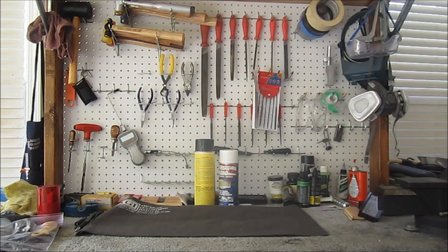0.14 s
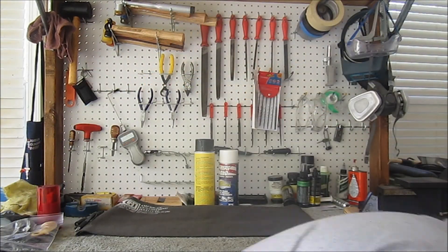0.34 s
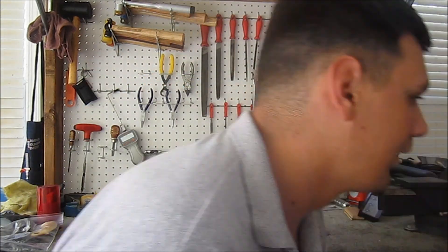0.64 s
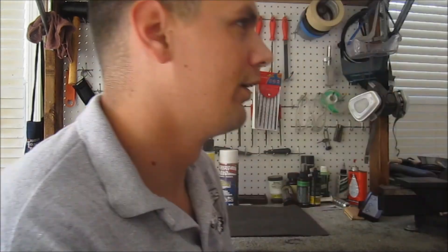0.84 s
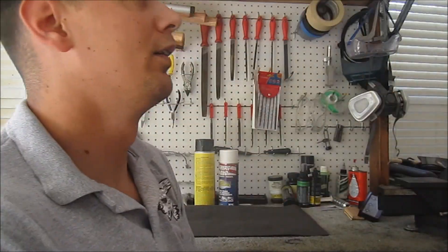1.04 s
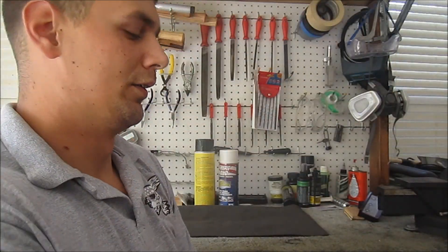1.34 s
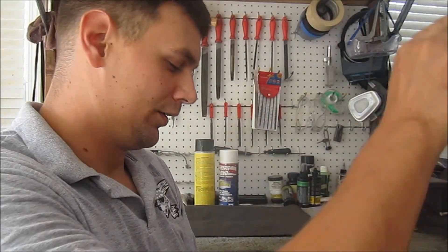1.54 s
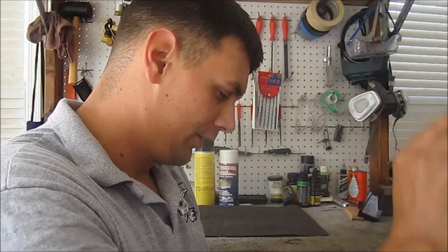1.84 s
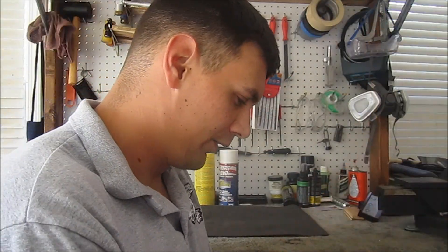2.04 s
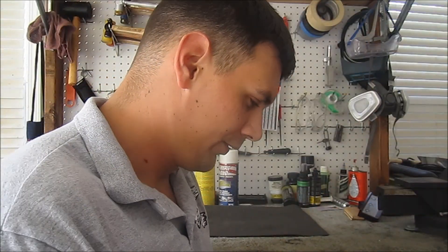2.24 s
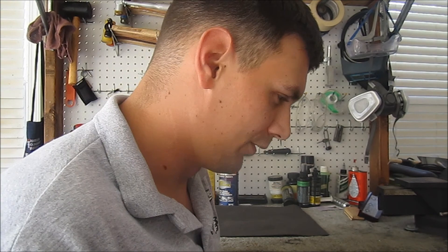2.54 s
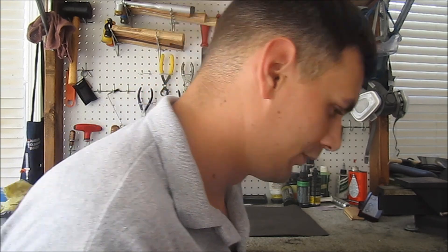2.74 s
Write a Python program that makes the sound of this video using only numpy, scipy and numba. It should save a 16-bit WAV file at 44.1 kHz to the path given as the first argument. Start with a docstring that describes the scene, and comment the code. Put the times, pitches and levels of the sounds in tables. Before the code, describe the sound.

A short steel bar cracks onto a concrete workshop floor and bounces, ringing with wavering high tones

```python
"""A short steel bar, handled and then dropped on the concrete floor of a small workshop, cracks and bounces up ringing.
Flying, it sends each ring along four paths to the microphone: Doppler shift gives falling and rising tones.
Before the drop, grainy noise rubs the held bar, and short pushes make taps and dull knocks; shoes and cloth shuffle.
Filtered noise makes the air, insects and low hum outside; delay lines and dying noise bands make the room.
The recorder's gain creeps up in the quiet and ducks at the blow, before a soft overload."""
import sys
import numpy as np
from scipy import signal
from scipy.fft import rfft, irfft
from scipy.io import wavfile
from scipy.ndimage import uniform_filter1d
from numba import njit

SR = 44100
rng = np.random.default_rng(int(sys.argv[2]) if len(sys.argv) > 2 else 0)


def log_audio(samples):
    """Write samples as a 16-bit WAV file to the path given in sys.argv[1]."""
    # one column per channel
    frames = np.atleast_2d(samples).T
    # limit to full scale, then quantise
    limited = np.clip(frames, -1, 1)
    pcm = np.round(limited * 32767).astype(np.int16)
    wavfile.write(sys.argv[1], SR, pcm)


def elevation(decibels):
    """Turn decibel levels (scalar or array-like) into linear amplitude ratios."""
    levels = np.asarray(decibels, float)
    return 10 ** (levels / 20)


N = 127890  # length in samples; source levels below are ahead of the recorder's gain


def curve(rows, col):
    """One column of a table, interpolated along the time axis."""
    points = np.array(rows)
    return np.interp(np.arange(N) / SR, points[:, 0], points[:, col])


def ring(force, hz, t60):
    """One mode: a two-way resonance that a force excites and that decays 60 dB in t60 seconds."""
    pole = np.exp(2j * np.pi * hz / SR - np.log(1000) / (t60 * SR))
    return signal.lfilter([1], [1, -pole], force).imag


def band(x, hz, width):
    """Resonant band-pass, scaled to unit rms."""
    y = signal.lfilter(*signal.iirpeak(hz, hz / width, SR), x)
    return y / y.std()


def push(s, db, ms):
    """A bell-shaped contact force; ms is three standard deviations, db sets its area."""
    t = np.arange(N) / SR - s
    w = ms / 1000
    bell = np.exp(-.5 * np.minimum((t / w * 3) ** 2, 200))
    return elevation(db) * bell * 3 / (w * SR * np.sqrt(2 * np.pi))


def walk(rate):
    """Slow random wander, smoothed from `rate` fresh values a second."""
    k = int(SR / rate)
    steps = np.repeat(rng.standard_normal(N // k + 1), k)
    return 0.37 * uniform_filter1d(uniform_filter1d(steps, k), k)[:N]


# spectral shape of the outside air: (frequency [Hz], relative density [dB per Hz])
AIR_SHAPE = [(12, -41.5), (20, -6.5), (116, -2.5), (150, -6.5), (277, -5), (319, -8), (357, -9.5),
             (1120, -15.5), (2200, -28), (4810, -10.5), (6720, -34.5), (8650, -12.5), (10800, -29.5),
             (13200, -18), (16000, -49)]
AIR_DB = -74  # before its slow wander
# insect chorus: (centre [Hz], bandwidth [Hz], level before shimmer [dB])
INSECTS = [(4125, 180, -79.5), (4773, 120, -81), (4685, 550, -82), (9295, 330, -83.5), (12790, 1300, -100)]
# low hum: (frequency [Hz], level [dB])
HUM = [(58, -87.5), (115, -88.5), (176, -91.5), (231, -89.5)]


def outside():
    """Out of doors: noise coloured by a spectrum, shimmering insect bands, and hum as narrow wavering bands."""
    shape, f = np.array(AIR_SHAPE), np.arange(N // 2 + 1) * SR / N + 1
    colour = elevation(np.interp(np.log(f), np.log(shape[:, 0]), shape[:, 1]))
    air = irfft(rfft(rng.standard_normal(N)) * colour, N)
    out = elevation(AIR_DB + walk(5.3)) * air / air.std()
    for hz, width, db in INSECTS:
        out = out + elevation(db + 2.0 * walk(18)) * band(rng.standard_normal(N), hz, width)
    for hz, db in HUM:
        out = out + elevation(db) * band(rng.standard_normal(N), hz, 5.5)
    return out


@njit
def walls(x, lags, gain, damp):
    """The room's echoes: eight delay lines that feed each other, duller on every round."""
    line, soft, out = np.zeros((8, 4096)), np.zeros(8), np.zeros(len(x))
    for i in range(len(x)):
        total = 0.
        for k in range(8):
            soft[k] += (1 - damp) * (gain[k] * line[k, (i - lags[k]) & 4095] - soft[k])
            total += soft[k]
            out[i] += soft[k] * (1 - 2 * (k % 2))  # alternate signs
        for k in range(8):
            line[k, i & 4095] = x[i] + soft[k] - total / 4
    return out


ROOM_T60_S, ROOM_DAMP = 0.51, 0.29  # decay before damping; damping is 0 (bright) to 1
RING_SEND_DB, NEAR_SEND_DB = -23, -26.5  # the flying bar; the crack, handling and shuffle


def room(free, near):
    """Workshop reverberation: both indoor groups are sent into the network of wall echoes."""
    lags = np.array([331, 457, 613, 787, 953, 1171, 1409, 1663])  # samples
    send = elevation(RING_SEND_DB) * free + elevation(NEAR_SEND_DB) * near + 1e-18
    return walls(send, lags, elevation(-60 * lags / SR / ROOM_T60_S), ROOM_DAMP)


LANDS_S = 2.2187  # when the bar leaves the floor and the scattered tail begins
# diffuse tail of the crack: (centre [Hz], level before build-up and decay [dB], t60 [s])
WASH = [(170, -52.5, 0.5), (280, -54, 0.67), (500.4, -45.5, 0.52), (622, -45.5, 0.42), (1076.9, -35, 0.304),
        (1503, -50.5, 0.57), (2312.4, -40, 0.45), (3450, -30, 0.418), (4502, -31, 0.519), (5567, -31, 0.41),
        (7130, -49.5, 0.14), (9538, -42.5, 0.3), (12380, -57.5, 0.51), (14000, -58, .2)]
WASH_PATCHY_DB, WASH_PATCHES_PER_S = 5.5, 60  # wander multiplier and rate


def wash():
    """The crack scattered by walls and shelves: noise bands build up in a few ms and die away unevenly."""
    t = np.maximum(np.arange(N) / SR - LANDS_S, 0)
    out = 0
    for hz, db, t60 in WASH:
        sos = signal.butter(2, [hz / 1.198, hz * 1.1933], "band", fs=SR, output="sos")
        noise = signal.sosfilt(sos, rng.standard_normal(N))
        level = elevation(db - 60 * t / t60 + WASH_PATCHY_DB * walk(WASH_PATCHES_PER_S))
        out = out + level * noise / noise.std()
    return out * (1 - np.exp(-t / 0.0055))


# shoes and cloth shuffling: (time [s], level [dB], extra level of the top resonance [dB])
SHUFFLE = [(.52, -100, -0.5), (.57, -70.5, -7), (.66, -74.5, -1.5), (.77, -77, -2.5), (.79, -71.5, -3),
           (.87, -70, -0.5), (.96, -73, -0.5), (1.03, -83, 7), (1.13, -78, -4.5), (1.2, -97.5, 6.5),
           (1.48, -87, 4.5), (1.53, -76, -1.5), (1.62, -85.5, 2)]
# their resonances: (centre [Hz], bandwidth [Hz], relative level [dB])
SHUFFLE_BODY = [(500, 240, -5), (759.2, 164, -3), (1011, 280, -5.5), (2053.6, 820, -6)]
# bright rustle of cloth: (start [s], length [s], low edge [Hz], high edge [Hz], level before its swell [dB])
RUSTLE = (.972, .09, 1500, 11000, -76)


def shuffle():
    """Shoes and cloth: gritty noise through a few soft resonances, and one bright rustle."""
    grit = rng.standard_normal(N) * elevation(8.6 * walk(150))
    body = 0
    for hz, width, db in SHUFFLE_BODY:
        level = elevation(db + curve(SHUFFLE, 2) * (hz > 1500))
        body = body + level * band(band(grit, hz, width), hz, width)
    s, length, lo_hz, hi_hz, db = RUSTLE
    u = np.clip((np.arange(N) / SR - s) / length, 0, 1)
    swell = np.sin(np.pi * np.sqrt(u))  # quick rise, slower fall
    sos = signal.butter(1, [lo_hz, hi_hz], "band", fs=SR, output="sos")
    cloth = signal.sosfilt(sos, rng.standard_normal(N))
    return elevation(curve(SHUFFLE, 1)) * body + elevation(db) * swell * cloth / cloth.std()


# the bar's modes: frequency [Hz]
BAR_HZ = [2119, 5488, 9880, 10720, 14900]
# the same modes: (level while held [dB], t60 while held [s], extra level on mirror paths in flight [dB])
BAR = [(4, 0.092, -12.5), (-1, 0.17, -2), (-11.5, 0.16, 1), (-30.5, 0.18, 1), (-30.5, 0.13, 5)]
# fingers sliding on the bar: (time [s], level before grain [dB], tilt towards the upper modes [dB])
RUB = [(.09, -105, -3), (.11, -62, -9.5), (.15, -61, -6), (.175, -66.5, -7.5), (.195, -84.5, -8.5),
       (.22, -72, -6.5), (.24, -82, 7), (.27, -76, 7.5), (.295, -67.5, -8.5), (.325, -65, 6),
       (.35, -66, -12.5), (.385, -73, 19.5), (.43, -73.5, -5), (.46, -71.5, -10.5), (.5, -79.5, 3),
       (.54, -105, 0), (1.51, -105, -8.5), (1.53, -69.5, -9), (1.58, -83.5, -10.5), (1.63, -100, -9)]
RUB_HISS_DB = -3.5  # relative to the rubbing noise
# taps on the held bar: (time [s], level [dB])
TAPS = [(.102, -68), (1.522, -71.5)]
# dull knocks of feet and bench: (time [s], level [dB], frequency [Hz], t60 [s])
KNOCKS = [(.102, -62.5, 662.5, 0.061), (0.101, -59, 1200, .015), (0.541, -62, 230, 0.168),
          (0.542, -55.5, 437.8, 0.0794), (.576, -56, 309.6, 0.048), (.742, -56, 576.8, 0.0654),
          (0.782, -60, 1000, 0.0296), (1.523, -64.5, 500, 0.0386)]
# faint short tones: (start [s], length [s], frequency [Hz], peak level [dB])
TONES = [(.39, .14, 435, -75), (2.145, .075, 705, -72)]


def handling():
    """Rubs and taps ring the damped bar in the hand; knocks and faint tones sound beside it."""
    t = np.arange(N) / SR
    grit = rng.standard_normal(N) * elevation(curve(RUB, 1) + 3.1 * walk(40))
    taps = sum(push(s, db, 0.099) for s, db in TAPS)
    bar = 0
    for k, (db, t60, _) in enumerate(BAR):
        rub = grit * elevation(-31 + curve(RUB, 2) * (k > 0))  # no tilt on the lowest mode
        bar = bar + elevation(db) * ring(rub + taps, BAR_HZ[k], t60)
    hiss = elevation(RUB_HISS_DB) * signal.lfilter(*signal.butter(1, 2500, fs=SR), grit)
    knocks = sum(ring(push(s, db, 0.1333), hz, t60) for s, db, hz, t60 in KNOCKS)
    tones = 0
    for s, length, hz, db in TONES:
        swell = np.sin(np.pi * np.clip((t - s) / length, 0, 1))
        tones = tones + elevation(db) * swell * np.sin(2 * np.pi * hz * t)
    return bar + hiss + knocks + tones


# contacts with the floor: (time [s], level [dB], push width [ms])
CONTACTS = [(2.2169, -27.5, .7), (2.2187, -15.5, 0.0708), (2.2234, -15.5, 0.076), (2.2253, -15.5, .08),
            (2.2308, -19.5, 0.043), (2.2326, -20.5, 0.096), (2.2371, -23, 0.051)]
# short modes of slab and bar at the contact: (frequency [Hz], level [dB], t60 [s])
CLACK = [(466, -17.5, 0.013), (674, -12, 0.021), (1044.8, -28.5, 0.24), (1161, -14, 0.057),
         (2157.3, -10, 0.023), (2795, -12.5, 0.0047), (3789, -0.5, 0.0087), (4348, -5, 0.01),
         (6498, -6.5, 0.0083), (10911, -5.5, .003), (12500, -11, .002)]
# the slab's dull thud: (frequency [Hz], level [dB], t60 [s])
THUD = (160, -17.5, 0.02)


def clack():
    """Bar on concrete: every contact excites the upper modes, only the first three the low ones and the thud."""
    pushes = [push(*c) for c in CONTACTS]
    force, heavy = sum(pushes), sum(pushes[:3])
    modes = sum(elevation(db) * ring(force if hz > 1500 else heavy, hz, t60) for hz, db, t60 in CLACK)
    crack = signal.sosfilt(signal.butter(3, 350, "high", fs=SR, output="sos"), modes)
    hz, db, t60 = THUD
    thud = signal.lfilter(*signal.butter(1, 70, "high", fs=SR), ring(heavy, hz, t60))
    return crack + elevation(db) * thud


REBOUND_M_S, BEAT_SMOOTH_S = 3.4, .008  # speed off the floor; smoothing of the ring levels
# paths to the microphone, direct first: (cosine to the upward motion, extra distance [m], level [dB])
PATHS = [(.8, 0.5, -2), (-0.74, 2.5, -7), (.25, 3.9, -7.5), (-0.46, 5.5, -9)]
# level of the lowest ring, swelling and dropping out as its shifted paths beat:
# (time [s], level before path levels [dB])
LOW_RING = [(2.225, -25.5), (2.25, -43), (2.31, -44.5), (2.34, -55.5), (2.366, -30), (2.39, -35.5),
            (2.416, -44), (2.45, -39.5), (2.496, -31), (2.535, -35), (2.568, -55), (2.6, -35.5),
            (2.63, -33.5), (2.66, -38), (2.682, -63.5), (2.703, -39.5), (2.727, -65.5), (2.75, -37),
            (2.775, -31.5), (2.792, -37), (2.804, -51.5), (2.82, -37.5), (2.842, -62), (2.865, -40.5),
            (2.9, -33.5)]
# the same for the second ring: (time [s], level before path levels [dB])
MID_RING = [(2.225, -33.5), (2.232, -46), (2.238, -19), (2.255, -19.5), (2.29, -22), (2.327, -27),
            (2.36, -21.5), (2.41, -33.5), (2.45, -23), (2.478, -43.5), (2.505, -29), (2.535, -33.5),
            (2.57, -29.5), (2.602, -46), (2.635, -30.5), (2.665, -38.5), (2.685, -49.5), (2.705, -41),
            (2.735, -60.5), (2.755, -37.5), (2.774, -54.5), (2.785, -38.5), (2.796, -52), (2.812, -40.5),
            (2.84, -63), (2.862, -46), (2.9, -49.5)]
# the same for the three upper rings: (time [s], then three levels before path levels [dB, dB, dB])
HIGH_RINGS = [(2.225, -32, -49.5, -60.5), (2.241, -28, -48.5, -46), (2.281, -27.5, -59.5, -54.5),
              (2.305, -26, -61, -55), (2.341, -30, -66, -60.5), (2.369, -31, -79.5, -61.5),
              (2.449, -44, -62, -72.5), (2.473, -37, -72.5, -75.5), (2.499, -52, -65, -79),
              (2.537, -41.5, -75.5, -78.5), (2.589, -48.5, -68, -80.5), (2.625, -50.5, -66, -92),
              (2.655, -50.5, -69, -87), (2.701, -53, -66.5, -91.5), (2.769, -61, -71, -93.5),
              (2.779, -54.5, -76, -109), (2.877, -66, -70, -109), (2.9, -59.5, -77, -82)]
# sizzle of the highest, densely packed modes: (centre [Hz], bandwidth [Hz], level at the start [dB], t60 [s])
SIZZLE = (15250, 900, -47, .4)


def flight():
    """The free bar rings; its rise and fall change each path's length and so Doppler-shift each ring."""
    t = np.arange(N) / SR
    up = np.maximum(t - LANDS_S, 0)  # seconds since the bounce
    height = REBOUND_M_S * up - 9.81 / 2 * up ** 2
    hz, width, db, t60 = SIZZLE
    noise = band(band(rng.standard_normal(N), hz, width), hz, width)
    out = elevation(db - 60 * up / t60) * (up > 0) * noise
    levels = [(LOW_RING, 1), (MID_RING, 1), (HIGH_RINGS, 1), (HIGH_RINGS, 2), (HIGH_RINGS, 3)]
    for k, (rows, col) in enumerate(levels):
        points = np.array(rows)
        swell = np.interp(t, points[:, 0], elevation(points[:, col]))
        swell = uniform_filter1d(swell, int(BEAT_SMOOTH_S * SR) + 1)
        for j, (cos, metres, db) in enumerate(PATHS):
            late = t - LANDS_S - (metres - cos * height) / 343  # time since arrival, at the speed of sound
            gain = elevation(db + BAR[k][2] * (j > 0)) * swell
            out = out + gain * np.sqrt(2) * np.sin(2 * np.pi * BAR_HZ[k] * late) * (late > 0)
    return out


def scene():
    """The bar, handling and shuffle sound in the room; the scattered tail and the outdoors are added dry."""
    free, near = flight(), clack() + handling() + shuffle()
    return (free + near + room(free, near) + wash() + outside())[None]


@njit
def agc(x, g, rise, duck, ceiling):
    """Recorder's gain control: gain creeps up, and drops fast while the output is over the ceiling."""
    y = np.empty(len(x))
    for i in range(len(x)):
        y[i] = g * x[i]
        g *= duck if abs(y[i]) > ceiling else rise
    return y


START_GAIN_DB, RISE_DB_S, DUCK_DB_MS = 12, 4.5, 17  # dB, dB per second, dB per millisecond
CEILING, OVERLOAD = 0.3254, .53  # amplitudes: where the gain ducks, where the soft overload saturates


def low_pass(x):
    """Removes everything above the highest recorded frequency."""
    return signal.sosfilt(signal.butter(12, 15900, fs=SR, output="sos"), x)


def record(dry):
    """The recorder: automatic gain, then soft overload."""
    rise, duck = elevation(RISE_DB_S / SR), elevation(-DUCK_DB_MS * 1000 / SR)  # per sample
    y = agc(dry[0], elevation(START_GAIN_DB), rise, duck, CEILING)
    mix = OVERLOAD * y / (OVERLOAD ** 6 + y ** 6) ** (1 / 6)
    return low_pass(mix[None])


dry = scene()
out = record(dry)
log_audio(out)
```